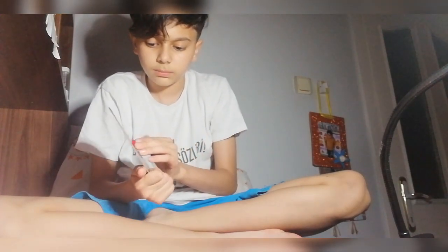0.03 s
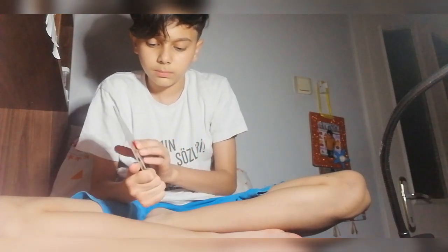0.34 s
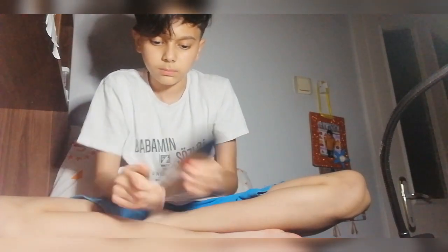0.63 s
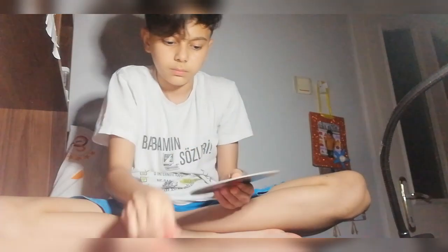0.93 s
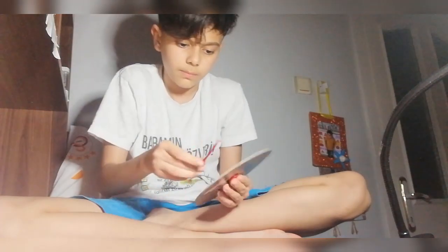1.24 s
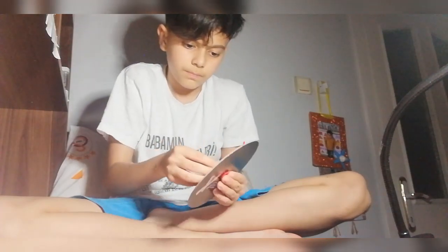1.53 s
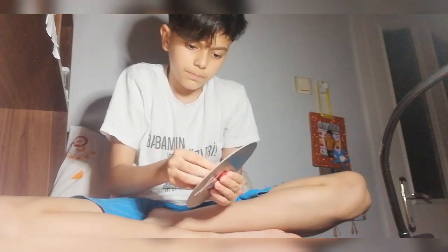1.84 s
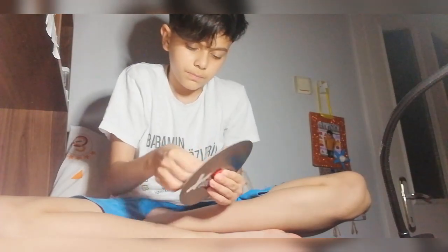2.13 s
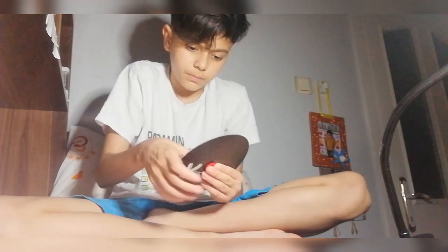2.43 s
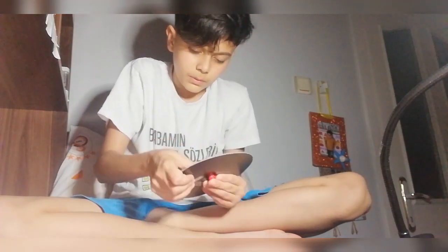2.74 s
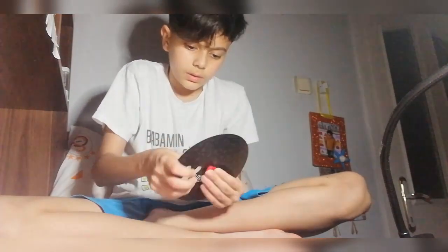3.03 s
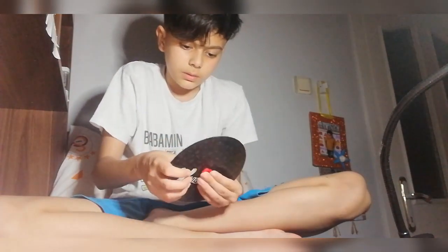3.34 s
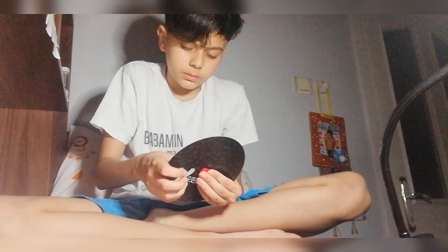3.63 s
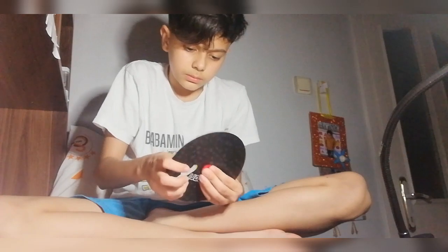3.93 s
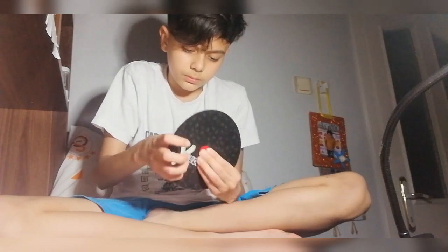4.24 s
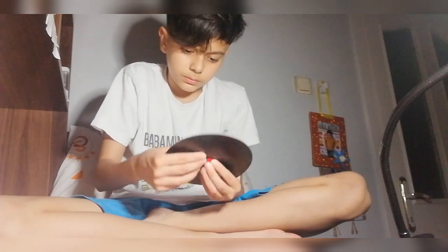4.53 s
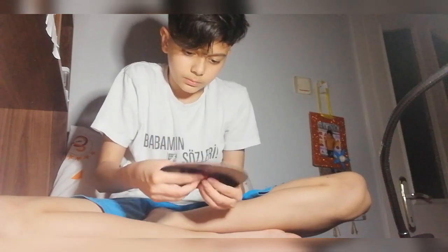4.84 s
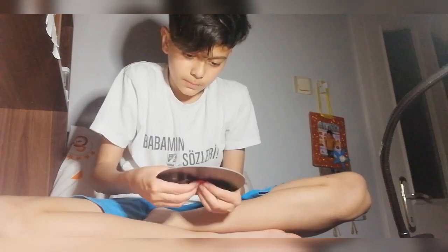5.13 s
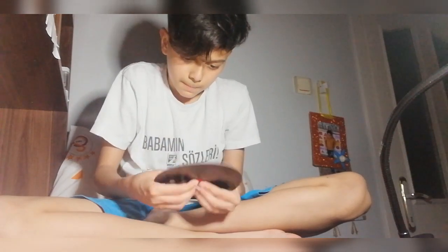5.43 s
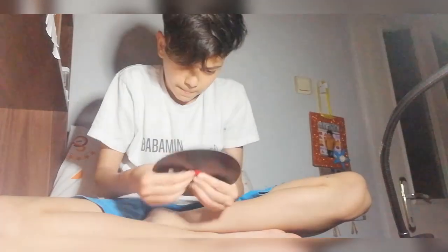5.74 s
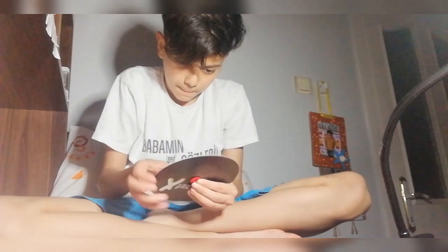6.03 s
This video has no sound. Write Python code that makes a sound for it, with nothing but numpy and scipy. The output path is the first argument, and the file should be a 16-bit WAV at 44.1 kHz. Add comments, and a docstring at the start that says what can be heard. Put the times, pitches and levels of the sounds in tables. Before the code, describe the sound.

Fingers push a plastic pointer onto a cardboard disc, making two snaps, light ticks, rubbing and one hollow pop.

```python
"""Two sharp plastic snaps, then ticks and scrapes: a cardboard game spinner handled in a small quiet room.
The pointer cracks and rings as it jumps the hub's lip, and chatters as it is pushed back on.
Each contact knocks the card disc; fingers tap it and rub it with a grainy stick-slip hiss.
A few swishes and one hollow pop pass by, all about a metre from the microphone.
The room answers briefly, over a low hum and still air."""
import sys
import numpy as np
from scipy import signal
from scipy.fft import rfft, irfft
from scipy.io import wavfile
from scipy.ndimage import uniform_filter1d

SR = 44100
rng = np.random.default_rng(int(sys.argv[2]) if len(sys.argv) > 2 else 0)


def dump_mix(stems):
    """Bounce the given channels to the path in sys.argv[1] as a 16-bit WAV at rate SR."""
    frames = np.atleast_2d(stems).T  # one column per channel
    limited = np.clip(frames, -1, 1)  # hard clip at full scale
    pcm = np.round(limited * 32767).astype(np.int16)
    wavfile.write(sys.argv[1], SR, pcm)


N = 273420
T = np.arange(SR // 5) / SR  # time within one hit [s]

# modes of a dull bump: (frequency [Hz], level [dB], t60 [s])
BUMP_MODES = [(126, 0.0046, 0.048), (185, 0, 0.032)]
# colour of a light contact: (frequency [Hz], level [dB])
TICK_COLOUR = [(200, -14), (800, -5), (1700, -2), (2900, -11), (4600, 2), (6000, -0.5), (8000, 3),
               (9300, 5), (11000, -16), (16000, -24)]


def snaps(crack_t60=0.043):
    """The pointer jumps over the hub's lip: it cracks and rings, and the disc springs back."""
    # (time [s], crack [dB], pointer ring [dB], disc [dB], disc pitch set by the grip [ratio],
    #  disc lean to the left [dB], thump [dB], build-up [s])
    hits = [(0.2166, -36.5, -30.5, -37, 0.73, 1, -43, 0.00278),
            (2.5749, -18.5, -37.5, -18, 0.98, 1.5, -40, 0.0012)]
    # modes of the plastic pointer: (frequency [Hz], level [dB], t60 [s])
    pointer_modes = [(1300, -22.5, .02), (3490, -15.5, 0.017), (4340, -17, 0.0092), (5140, -14, 0.013),
                     (6800, -18.5, 0.0099), (8150, -29, .012), (8500, 0, .018), (8920, -1.5, 0.05),
                     (9050, -2.5, .02), (10180, -13, 0.0079)]
    # colour of the crack on each side: (frequency [Hz], level [dB])
    left_colour = [(200, -39.5), (700, -1.5), (1800, -15.5), (2900, -19), (4300, -5.5), (5400, -13),
                   (7000, -1.5), (8400, 1.5), (9700, -28.5), (12000, -17), (16000, -23.5)]
    right_colour = [(200, -33.5), (700, -16.5), (1800, -15.5), (2900, -18.5), (4300, -11), (5400, -11),
                    (7000, 1), (8600, 5), (9700, -1), (12000, -19.5), (16000, -16)]
    out = np.zeros((2, N))
    for s, crack_db, ring_db, disc_db, pitch, lean_db, thump_db, rise in hits:
        left, right = chatter(crack_t60, rise)
        crack = np.array([colour(left, left_colour), colour(right, right_colour)])
        pointer = signal.oaconvolve(chatter(t60=0.0027, rise=rise), ring(pointer_modes)[None])
        add(out, s, amp(crack_db) * peaked(crack))
        add(out, s, amp(ring_db) * peaked(pointer))
        add(out, s + rise / 2, amp([[disc_db + lean_db], [disc_db - lean_db]]) * knock(pitch, turn=1.29))
        add(out, s + rise, amp(thump_db) * ring(BUMP_MODES))
    return out


def clicks(tick_trim_db=-4, disc_trim_db=-5, pitch_spread=0.062, left_db=0.9, wander_db=2):
    """The pointer ticks on hub and card: a sharp impact, chatter, and a knock at a changing grip."""
    # (time [s], tick [dB], disc [dB], brightness [dB/octave], chatter against the impact [dB])
    hits = [(0.643, -43.5, -47.5, 11, -3), (0.7068, -42.5, -54, 4, -8), (0.9227, -55, -70, -3.5, -1),
            (1.606, -53.5, -75, 2, -3), (2.2543, -34, -47.5, 4, -4), (2.8962, -45.5, -53.5, 5.5, -3),
            (3.2106, -54, -76, -1, -9), (3.4138, -50.5, -52.5, -3.5, -7), (3.4466, -39, -39, -4, 1),
            (4.282, -53.5, -62, -1.5, -4), (4.3047, -35, -50, -1, 9), (4.3666, -33, -55, -2.5, -5),
            (4.3932, -32, -38.5, 4.5, 0), (4.4462, -42.5, -53, -1.5, -6), (4.4614, -41, -47, 3, -12),
            (4.498, -38.5, -50, -3.5, -9.5), (4.5182, -42.5, -45.5, 8, -5), (4.5507, -35.5, -47, -0.5, 1),
            (4.9327, -50, -54.5, -2.5, -8), (5.0784, -42, -54, 2, -1), (5.0983, -43.5, -54.5, 0.5, -8),
            (5.1429, -46, -51.5, 5, -1), (5.4944, -53, -60, 0, -3), (5.574, -53.5, -58, 0.3, -5),
            (5.655, -53, -55, -3, -6), (5.8044, -41, -47.5, 8, 11), (5.8857, -43.5, -64, -2, 5),
            (5.9424, -38.5, -51, 3, 9), (6.0114, -40, -60, -1.3, -8), (6.0899, -43.5, -50.5, 4.5, -2),
            (6.1445, -39, -52, 3.5, -12)]
    out = np.zeros((2, N))
    for s, tick_db, disc_db, tilt, chatter_db in hits:
        impact = chatter(t60=0.005, rise=0.0002)
        rattle = amp(chatter_db) * chatter(t60=0.033, rise=0.001)
        tick = peaked(colour(impact + rattle, tilted(TICK_COLOUR, tilt, pivot_hz=7000)))
        pan_db = left_db + wander_db * rng.standard_normal()  # wanders as the disc tilts
        pitch = 1 + pitch_spread * rng.uniform(-1.2, 1)
        add(out, s, amp(tick_db + tick_trim_db) * amp([[pan_db / 2], [-pan_db / 2]]) * tick)
        add(out, s, amp(disc_db + disc_trim_db) * knock(pitch))
    return out


def knock(pitch, turn=1.0):
    """The card disc radiates from both faces, so left and right ring out of step by turn radians."""
    # modes of the disc: (frequency [Hz], level [dB], t60 [s])
    disc_modes = [(450, -5, 0.038), (574, 2.5, 0.023), (672, -1.5, 0.022), (728, -6, 0.025),
                  (922, -3, 0.02), (1017, -6.5, 0.026), (1252, -8.5, 0.019), (1773, -14.5, 0.017),
                  (2150, -20, 0.012)]
    left = ring(disc_modes, pitch)
    right = (signal.hilbert(left) * np.exp(-1j * turn)).real
    return np.array([left, right])


def pop(s=4.0502, db=-32):
    """One short hollow pop with almost no treble."""
    # modes of the pop: (frequency [Hz], level [dB], t60 [s])
    pop_modes = [(507, 6, 0.022), (1090, 18, 0.013), (1350, -29, 0.0086), (1470, -17, 0.012),
                 (2340, -1, 0.017), (4230, 0.5, 0.0033)]
    out = np.zeros((2, N))
    add(out, s, amp(db) * ring(pop_modes))
    return out


def taps(trim_db=-1, skin_db=-18, soft_hz=1100):
    """Soft fingertips reach only the disc's lower modes, with a faint brush of skin; the hands bump."""
    # finger taps on the disc: (time [s], level [dB], pitch [ratio])
    touches = [(0.581, -55.5, 2.35), (0.638, -52, 0.77), (0.671, -44, 1.87), (1.660, -61.5, 0.97),
               (1.773, -61, 0.96), (1.817, -61.5, 1.26), (2.146, -59, 1.42), (2.283, -40, 0.96),
               (2.999, -46, 1.01), (3.926, -53.5, 1.04), (4.354, -47, 1.03), (4.478, -47.5, 0.95),
               (4.583, -48.5, 1.07), (4.608, -55.5, 1), (4.827, -56.5, 0.97), (5.264, -59, 0.856),
               (5.771, -50.5, 1.82), (5.905, -50, 2.2), (5.970, -51, 1.74), (5.990, -51, 1.02),
               (6.024, -49.5, 1), (6.113, -54, 1.63)]
    # dull bumps of the hands and the disc's edge: (time [s], level [dB], pitch [ratio])
    bumps = [(0.922, -52.5, 0.8), (2.285, -51, 1.04), (4.387, -49, 1.25), (4.396, -44, 1.05),
             (4.401, -48, 0.43), (5.81, -56.5, 0.87), (6.01, -51.5, 0.79)]
    out = np.zeros((2, N))
    lowpass = signal.butter(2, soft_hz, fs=SR, output="sos")
    for s, db, pitch in touches + fidgets():
        brush = peaked(colour(chatter(t60=0.04, rise=0.0012), TICK_COLOUR))
        soft_knock = signal.sosfilt(lowpass, knock(pitch))
        add(out, s, amp(db + trim_db) * (soft_knock + amp(skin_db) * brush))
    for s, db, pitch in bumps:
        add(out, s, amp(db) * ring(BUMP_MODES, pitch))
    return out


def fidgets(from_s=1.7, to_s=4.1, per_s=9, db=-66.5, spread_db=4, lowest=0.9, highest=1.7):
    """Faint random touches as the fingers work at the pointer: (time [s], level [dB], pitch [ratio])."""
    span = to_s - from_s
    draws = rng.random((round(span * per_s), 3))
    return [(from_s + when * span, db + spread_db * (2 * force - 1), lowest + grip * (highest - lowest))
            for when, force, grip in draws]


def rubs(hiss_trim_db=-2, card_trim_db=-2.5, width=0.72, hiss_uneven_db=2, card_uneven_db=3.5):
    """Sliding makes a grainy hiss and drives the card's body; both follow the uneven pressure."""
    # strokes of finger or pointer over the card; a nail is brighter than a fingertip:
    # (start [s], length [s], hiss [dB], card body [dB], body brightness [dB/octave])
    strokes = [(0.638, 0.059, -59, -58, -2), (2.248, 0.027, -49, -49, 0.5),
               (4.31, 0.23, -59.5, -58.5, -0.3), (4.349, 0.037, -53.5, -49, -0.5),
               (4.77, 0.25, -70, -65.5, -0.5), (5.095, 0.058, -59.5, -55, -0.5),
               (5.19, 0.19, -71.5, -69, -1), (5.792, 0.023, -55, -58.5, 3.5), (5.829, 0.2, -64.5, -57, 3.5),
               (6.086, 0.077, -70, -62.5, 2)]
    # colours of the sliding hiss and of the card under it: (frequency [Hz], level [dB])
    hiss_colour = [(1500, -36), (2900, -9), (4600, -3.5), (6000, -5.5), (8000, 0), (9300, -5), (11000, -9),
                   (16000, -20.5)]
    card_colour = [(60, -13), (110, -8.5), (175, -1.5), (280, -21.5), (450, 0), (600, 1), (850, -7),
                   (1200, -6), (1650, -7.5), (2300, -14), (3200, -21), (8000, -24), (16000, -79)]
    out = np.zeros((2, N))
    catch = catching(per_s=110)
    friction = grains(per_s=4000, spread_db=2.5) * amp(hiss_uneven_db * catch)
    hiss = evened(colour(friction, hiss_colour))
    mid, side = grains(per_s=1500, spread_db=1.2) * amp(card_uneven_db * catch)
    slips = np.array([mid + width * side, mid - width * side])
    for s, length, hiss_db, card_db, tilt in strokes:
        card = evened(colour(slips, tilted(card_colour, tilt, pivot_hz=700)))
        pressure = envelope(s, length, attack_s=0.012, sag_db_per_s=9, release_db_per_s=331)
        out += pressure * (amp(hiss_db + hiss_trim_db) * hiss + amp(card_db + card_trim_db) * card)
    return out


def swishes():
    """Swung and turned, the disc brushes past with a high, finely grained hiss."""
    # moves of the disc: (start [s], length [s], level [dB])
    swings = [(0.561, 0.27, -60), (2.2, 0.069, -63.5), (2.888, 0.056, -64)]
    # colour of a swish: (frequency [Hz], level [dB])
    swish_colour = [(3000, -16.5), (5000, -10), (6500, -7.5), (8000, 8), (9500, -2), (11000, -12),
                    (15000, -20)]
    motion = sum(amp(db) * envelope(s, length, attack_s=0.055, sag_db_per_s=6, release_db_per_s=256)
                 for s, length, db in swings)
    return motion * evened(colour(grains(per_s=5000, spread_db=2.5), swish_colour))


def room(x, tail_db, echo_db, bass_hz=500, bloom_s=0.011):
    """Near surfaces mirror the treble; a short diffuse tail follows, its bass alike on both sides."""
    # decay of the room: (frequency [Hz], t60 [s])
    decay = [(120, 0.31), (600, 0.12), (2500, 0.277), (8000, 0.16), (15000, 0.22)]
    # early reflections: (delay [s], left [gain], right [gain])
    reflections = [(.0041, 0.65, 0.26), (.0098, 0.4, 0.24), (0.0132, .14, .22), (0.0176, .18, 0.085)]
    hz, t, noise = signal.stft(rng.standard_normal((2, SR // 2)), SR, nperseg=256)
    same = 1 / (1 + (hz[:, None] / bass_hz) ** 2)
    noise[1] = same * noise[0] + np.sqrt(1 - same ** 2) * noise[1]
    fade = amp(-60 * t / read(decay, hz)[:, None]) * np.minimum(t / bloom_s, 1)
    tail = signal.istft(noise * fade, SR, nperseg=256)[1]
    out = x + amp(tail_db) * signal.fftconvolve(x, tail / np.linalg.norm(tail[0]), axes=1)[:, :N]
    treble = signal.sosfilt(signal.butter(2, 2000, "high", fs=SR, output="sos"), x)
    for delay, left, right in reflections:
        add(out, delay, amp(echo_db) * treble * [[left], [right]])
    return out


def tones(hum_hz=48.2, hum_db=-70, thin_hz=1040, thin_db=-80.5):
    """A low hum fills the room; a barely audible thin tone lingers after one click."""
    turn = 2 * np.pi * np.arange(N) / SR
    linger = envelope(start=3.45, length=0.38, attack_s=0.04, sag_db_per_s=4, release_db_per_s=200)
    hum = amp(hum_db) * np.sin(hum_hz * turn)
    thin = amp(thin_db) * linger * np.sin(thin_hz * turn)
    return np.sqrt(2) * (hum + thin)


def air(level_db=-64):
    """Room tone: a low rumble, alike on both sides, under a thin, wide hiss."""
    # colour of the still air: (frequency [Hz], level [dB])
    air_colour = [(10, -8), (33, -9), (54, 0.7), (78, -9), (120, -10), (180, -12), (280, -20), (550, -22),
                  (1000, -24), (3000, -26), (6000, -29), (9000, -28), (11000, -34), (16000, -37)]
    # stereo image, negatives read as zero: (frequency [Hz], left-right likeness [ratio])
    likeness = [(60, 1), (180, 0.8), (550, -0.32), (1650, 0.24), (4970, -0.48), (15000, -0.88)]
    hz = np.fft.rfftfreq(N, 1 / SR)
    left, apart = rfft(rng.standard_normal((2, N)))
    same = np.clip(read(likeness, hz), 0, 1)
    right = same * left + np.sqrt(1 - same ** 2) * apart
    return amp(level_db) * evened(irfft(np.array([left, right]) * amp(read(air_colour, hz)), N))


def ring(modes, pitch=1):
    """Damped modes; neighbours swing in opposite directions, so the ring takes a moment to build."""
    return peaked(sum((-1) ** k * amp(db - 60 * T / t60) * np.sin(2 * np.pi * hz * pitch * T)
                      for k, (hz, db, t60) in enumerate(modes)))


def chatter(t60, rise):
    """A dying burst of tiny contacts, different on each side; t60 and rise in seconds."""
    fade = amp(-60 * np.maximum(T - rise, 0) / t60)
    return rng.standard_normal((2, len(T))) * np.minimum(T / rise, 1) * fade


def grains(per_s, spread_db):
    """Stick-slip: many tiny releases of uneven size."""
    size = amp(spread_db * np.minimum(rng.exponential(1, N), 4))
    released = rng.random(N) < per_s / SR
    return size * released * rng.standard_normal((2, N))


def catching(per_s):
    """A random wobble of rms 1: the finger catches and slips about per_s times a second."""
    knots = rng.standard_normal(4000)
    return evened(np.interp(np.arange(N) / SR * per_s, np.arange(len(knots)), knots))


def envelope(start, length, attack_s, sag_db_per_s, release_db_per_s):
    """Gain of one gesture: attack, a sagging hold, release."""
    t = np.maximum(np.arange(N) / SR - start, 0)
    drop_db = sag_db_per_s * np.minimum(t, length) + release_db_per_s * np.maximum(t - length, 0)
    return np.minimum(t / attack_s, 1) * amp(-drop_db)


def colour(x, points, size=2048):
    """Minimum-phase EQ with the given spectrum, so attacks stay sharp."""
    log_gain = np.log(amp(read(points, abs(np.fft.fftfreq(size, 1 / SR)))))
    kernel = np.fft.ifft(np.exp(np.conj(signal.hilbert(log_gain)))).real[:size // 2]
    return signal.oaconvolve(x, kernel.reshape((1,) * (x.ndim - 1) + (-1,)))[..., :x.shape[-1]]


def tilted(points, db_per_octave, pivot_hz):
    """A spectrum turned brighter or duller around the pivot."""
    return [(hz, db + db_per_octave * np.log2(hz / pivot_hz)) for hz, db in points]


def read(points, hz):
    """Reads a table on a log-frequency axis."""
    f, value = np.transpose(points)
    return np.interp(np.log(hz + 1), np.log(f + 1), value)


def amp(db):
    """Decibels to gain."""
    return 10 ** (np.asarray(db) / 20)


def evened(x):
    """Scales to rms 1."""
    return x / np.sqrt(np.mean(x ** 2) + 1e-20)


def peaked(x):
    """Scales so that the loudest 3 ms have rms 1."""
    power = np.atleast_2d(x ** 2).mean(0)
    return x / np.sqrt(uniform_filter1d(power, size=132, mode="constant").max())


def add(mix, s, sound):
    """Mixes a sound in at time s."""
    part = mix[:, max(round(s * SR), 0):][:, :sound.shape[-1]]
    part += sound[..., :part.shape[-1]]


def scene():
    """Snaps, handling and pop, each with its own send to the room, over hum and air."""
    handling = room(clicks() + taps() + rubs() + swishes(), tail_db=-7, echo_db=-8.5)
    snapping = room(snaps(), tail_db=-4.5, echo_db=0.5)
    popping = room(pop(), tail_db=-12, echo_db=-1.5)
    return snapping + handling + popping + tones() + air()


def record(dry, edge_hz=16100):
    """A steep low-pass trims the very top."""
    lowpass = signal.firwin(255, edge_hz, window=("kaiser", 8), fs=SR)
    return signal.oaconvolve(dry, lowpass[None], "same")


dry = scene()
out = record(dry)
dump_mix(out)
```